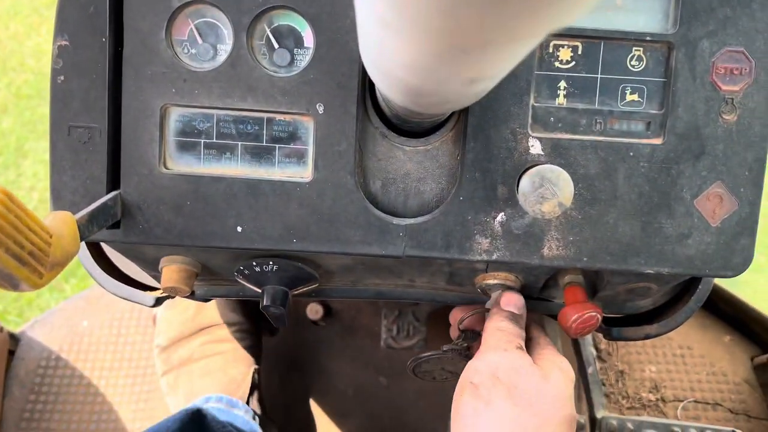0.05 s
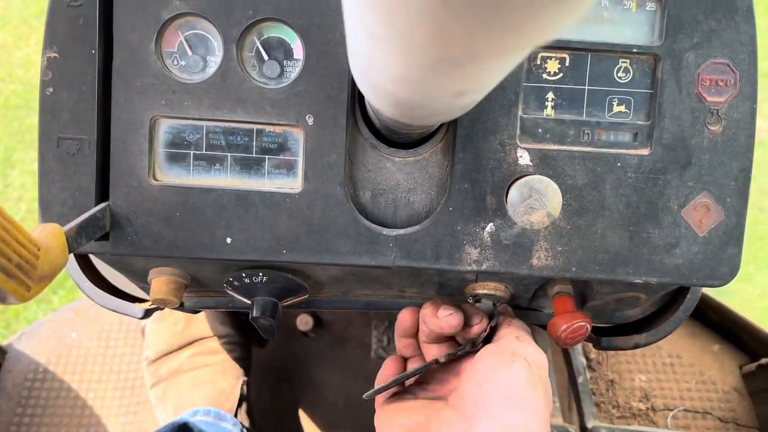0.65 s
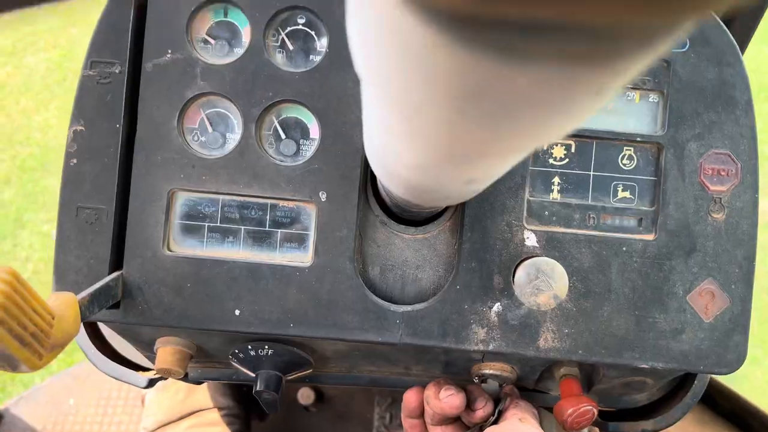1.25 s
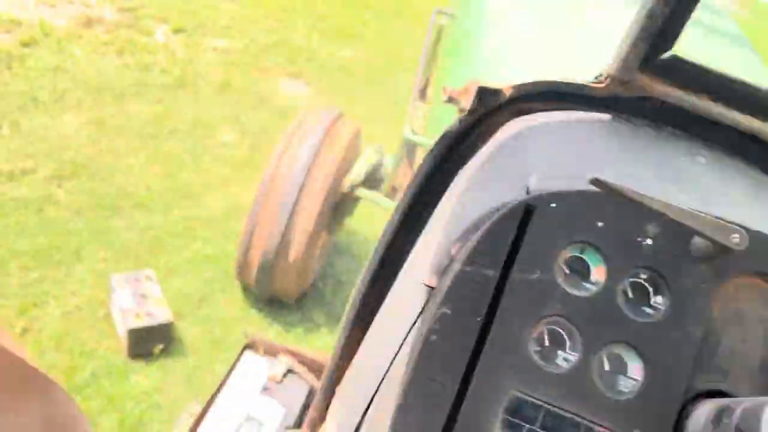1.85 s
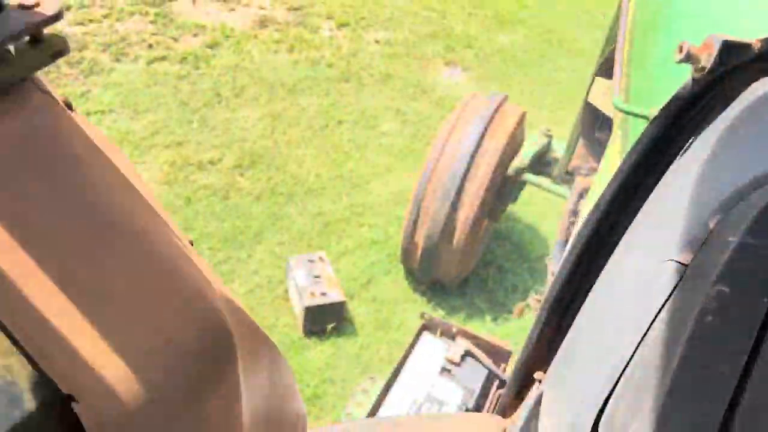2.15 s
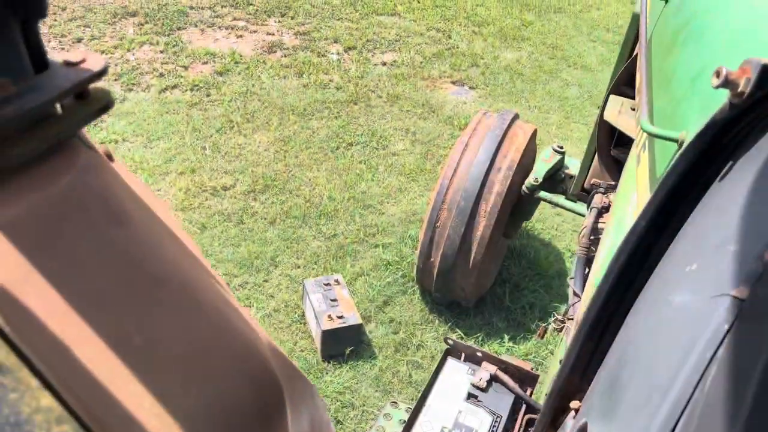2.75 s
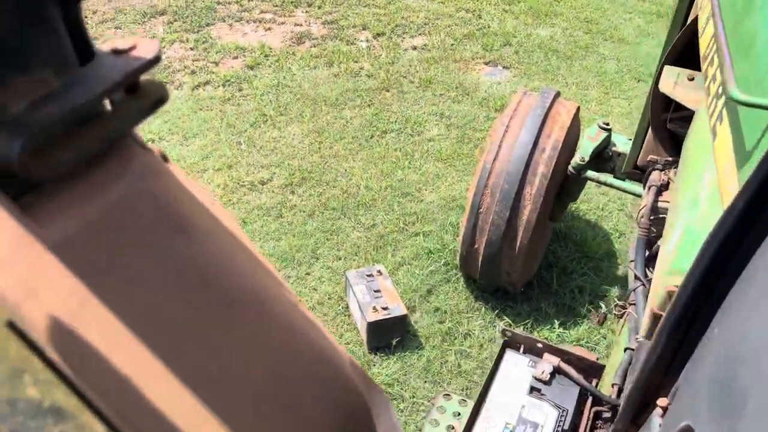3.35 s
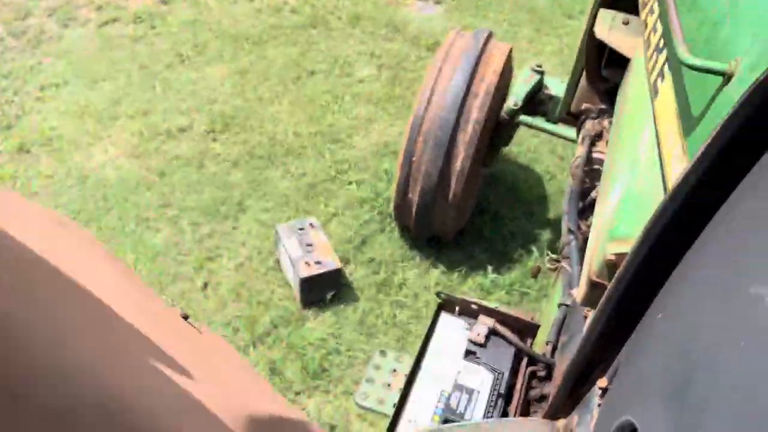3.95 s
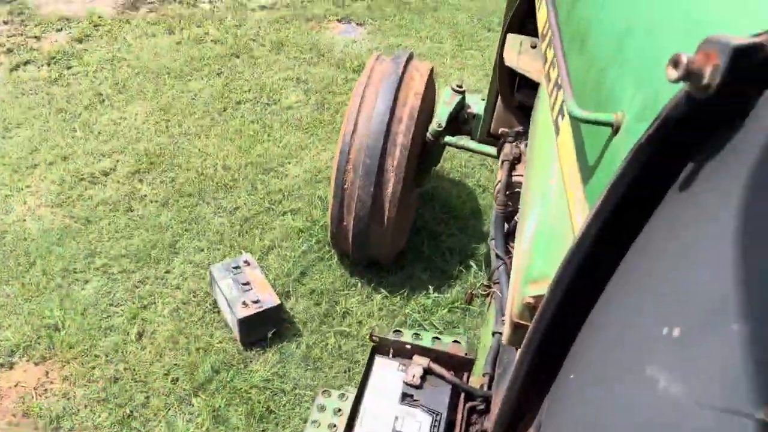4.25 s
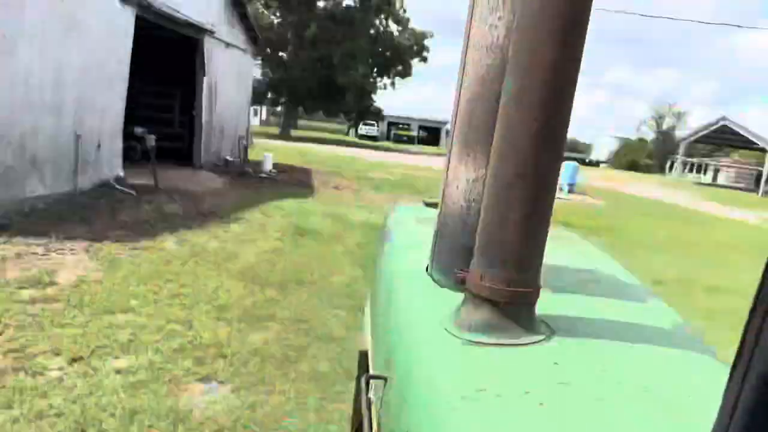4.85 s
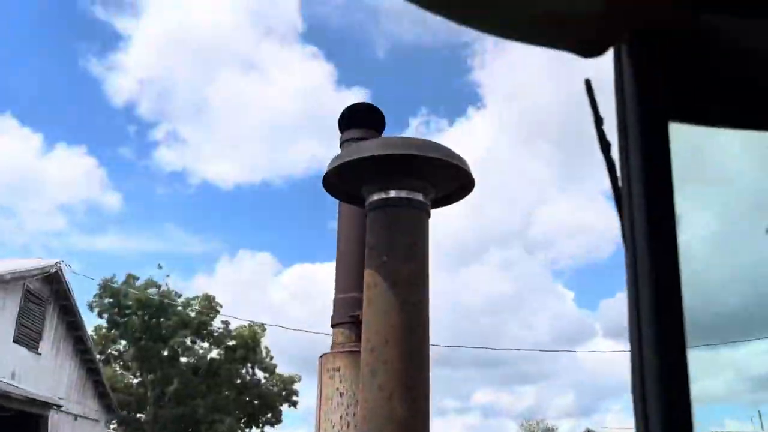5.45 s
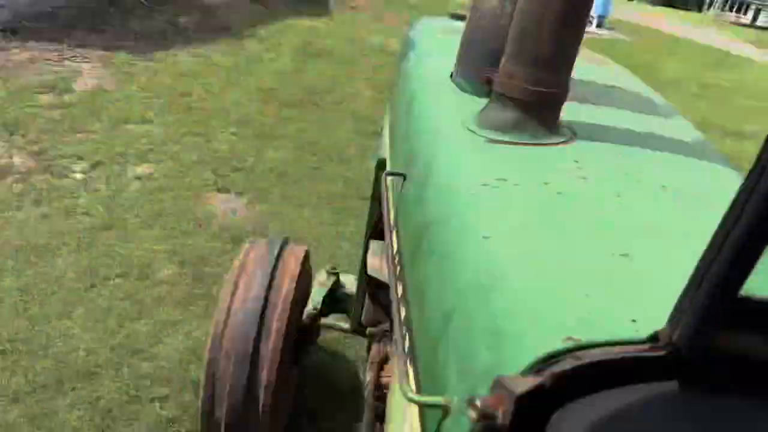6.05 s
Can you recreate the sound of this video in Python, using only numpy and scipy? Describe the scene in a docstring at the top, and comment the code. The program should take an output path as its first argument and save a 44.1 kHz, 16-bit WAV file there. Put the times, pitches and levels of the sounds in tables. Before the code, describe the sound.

Key clicks and a short starter whine, then a tractor's diesel engine catches, revs up with metal clatter and drops to idle.

```python
"""A six-cylinder diesel tractor is started, heard from the driver's seat.
First the key clicks, the solenoid slams in and the starter's gear teeth whine for half a second.
Then the engine catches: periodic firings drive the exhaust and excite the block, and as the speed
flares, forced vibration rattles loose metal in the cab. The fuel is cut and the engine coasts down
with a faint whistle. Last, the governor lifts it to a gently hunting idle."""
import sys
import numpy as np
from scipy import signal
from scipy.fft import rfft, irfft, next_fast_len
from scipy.io import wavfile
from scipy.ndimage import uniform_filter1d, minimum_filter1d

SR = 44100
rng = np.random.default_rng(int(sys.argv[2]) if len(sys.argv) > 2 else 0)


def wrap_up_sound(samples):
    """Save the sound to the file named by the first command line argument, as 16-bit audio."""
    columns = np.atleast_2d(samples).T
    # keep every value between -1 and 1, then stretch to whole-number steps
    tamed = np.clip(columns, -1, 1)
    steps = np.round(tamed * 32767).astype(np.int16)
    wavfile.write(sys.argv[1], SR, steps)


N = 268569
T = np.arange(N) / SR


def amp(db):
    """Amplitude ratio of a level."""
    return 10 ** (np.asarray(db) / 20)


def unit_rms(x):
    """Normalisation to rms 1."""
    return x / np.sqrt(np.mean(x ** 2) + 1e-20)


def curves(rows):
    """Linear interpolation of a table's columns in time."""
    times, *columns = np.transpose(rows)
    return [np.interp(T, times, column) for column in columns]


def level_at(spectrum, hz):
    """Interpolation of a spectrum on a log-frequency axis."""
    f, db = np.transpose(spectrum)
    return np.interp(np.log(hz + 1), np.log(f + 1), db)


def ramp(start, length):
    """Linear rise from 0 to 1."""
    return np.clip((T - start) / length, 0, 1)


def arch(start, length):
    """Half-sine envelope."""
    return np.sin(np.pi * ramp(start, length))


def add(mix, start, sound):
    """Superposition of a sound from its start time."""
    part = mix[..., max(round(start * SR), 0):][..., :sound.shape[-1]]
    part += sound[..., :part.shape[-1]]


def wander(hz):
    """Random fluctuation: low-pass noise of rms 1."""
    lowpass = np.exp(-(np.fft.rfftfreq(N, 1 / SR) / hz) ** 2)
    return unit_rms(irfft(rfft(rng.standard_normal(N)) * lowpass, N))


def resonance_db(hz, modes):
    """Level added by Lorentzian resonance peaks."""
    return sum(lift / (1 + (2 * (hz - f) / width) ** 2) for f, width, lift in modes)


def colour(x, spectrum, modes=(), size=8192):
    """Minimum-phase filter of unit energy: a broad spectrum plus narrow resonances."""
    hz = abs(np.fft.fftfreq(size, 1 / SR))
    db = level_at(spectrum, hz) + resonance_db(hz, modes)
    log_gain = np.log(amp(np.maximum(db, -100)))
    taps = np.fft.ifft(np.exp(np.conj(signal.hilbert(log_gain)))).real[:size // 2]
    return signal.oaconvolve(x, taps[None] / np.linalg.norm(taps), axes=1)[:, :N]


def resonate(x, hz, width, skirt_widths=7):
    """Forced response of one mode at rms 1; a second, wider filter steepens its skirts."""
    for bandwidth in (width, width * skirt_widths):
        x = signal.lfilter(*signal.iirpeak(hz, hz / bandwidth, SR), x)
    return unit_rms(x)


def impact(t60, tail_db, tail_t60, rise_s=0.00026):
    """Two-slope decay of noise: a metallic crack and its reverberation in the cab."""
    t = np.arange(SR // 3) / SR
    decay = amp(-60 * t / t60) + amp(tail_db - 60 * t / tail_t60)
    return decay * (1 - np.exp(-t / rise_s)) * rng.standard_normal((2, len(t)))


# spectrum of the faint background rumble and hiss: f/Hz, level/dB
BACKGROUND_SPECTRUM = [(18, -23), (30, 1.5), (95, -3.5), (202, -17), (315, -15), (410, -24.5), (2180, -36),
                       (6210, -48), (9940, -47), (10700, -51), (11900, -37), (15500, -41)]
def background():
    """Ambient noise: steady, random and strongest in the bass."""
    return amp(-54) * colour(rng.standard_normal((2, N)), BACKGROUND_SPECTRUM)


# sound field in the cab: f/Hz, side against mid/dB
CAB_WIDTH = [(40, -36), (70, -24), (125, -10.5), (250, -13.5), (500, -6.5), (1000, -3), (2500, -2),
             (5000, -2.5), (8500, 3), (12500, -1)]
# its balance: f/Hz, left minus right/dB
CAB_BALANCE = [(60, 0.34), (200, 1), (700, 1), (1500, 2), (2400, 0.5), (4400, 7), (8000, 2), (15000, -2)]
def cab(mid_side):
    """Decorrelation: reflections from the glass widen the treble. Returns left and right."""
    size = next_fast_len(N + 4096)
    hz = np.fft.rfftfreq(size, 1 / SR)
    mid, side = rfft(mid_side, size)
    side = side * amp(level_at(CAB_WIDTH, hz))
    lean = amp(level_at(CAB_BALANCE, hz) / 2)
    return irfft(np.array([(mid + side) * lean, (mid - side) / lean]), size)[:, :N]


def whistle(start_s=1.95, length_s=0.93, start_hz=3970, fall_hz_per_s=400):
    """Frequency glide: a thin wavering tone sinks while the engine coasts."""
    hz = (start_hz - fall_hz_per_s * (T - start_s)) * (1 + 0.0033 * wander(84))
    envelope = amp(-47.5 + 2 * wander(25)) * arch(start_s, length_s)
    return np.array([envelope * np.sin(2 * np.pi * np.cumsum(hz) / SR), np.zeros(N)])


# jolts to the cab: t/s, level/dB, f/Hz, T60/s
CAB_JOLTS = [(0, -42.5, 99, 0.45), (0.18, -29, 128, 0.28), (.19, -37, 82.6, 0.39), (.618, -12, 80.6, 0.34),
             (0.671, -7, 73, 0.16), (1.02, -19.5, 62, 0.64)]
def jolts():
    """Damped free vibration: the cab booms as the switch and the starter's torque jolt it."""
    out, t = np.zeros((2, N)), np.arange(SR) / SR
    for start, db, hz, t60 in CAB_JOLTS:
        envelope = amp(db - 60 * t / t60) * (1 - np.exp(-t / 0.0095))
        add(out[0], start, envelope * np.sin(2 * np.pi * hz * t))
    return out


# impacts of key, switch and solenoid: t/s, level/dB, tilt/(dB per octave), T60/s
SWITCH_IMPACTS = [(.098, -56, -5.5, 0.25), (.131, -41.5, -1.5, 0.34), (0.152, -33, 0, 0.064),
                  (0.161, -21, 2.5, 0.07), (.176, -28, -9.5, 0.13), (0.482, -59, 7, 0.059),
                  (0.509, -50.5, -0.5, 0.45), (.544, -35.5, 4, 0.18), (.568, -25, -4.5, 0.37),
                  (.574, -22, -3.5, .12), (0.589, -16, 4, 0.086), (0.617, -31, 4.5, 0.21)]
# their spectrum: f/Hz, level/dB
SWITCH_SPECTRUM = [(60, -45), (100, -25), (228, -0.5), (326, -11), (564, 2.5), (1620, 1.5), (2000, -6),
                   (4000, -10.5), (7700, -23), (15500, -33.5)]
def switchgear():
    """Impact noise: the key turns through its detents and the solenoid throws the pinion in."""
    out = np.zeros((2, N))
    for start, db, tilt, t60 in SWITCH_IMPACTS:
        hit = np.zeros((2, N))
        add(hit, start, amp(db) * impact(t60, tail_db=-36, tail_t60=0.2))
        out += colour(hit, [(hz, level + tilt * np.log2(hz / 1000)) for hz, level in SWITCH_SPECTRUM])
    return out


# gear mesh of the starter, which slows at each compression: t/s, f/Hz, level/dB
CRANKING = [(.6, 300, -47), (.685, 464, -34), (.72, 560, -42), (.755, 610, -37), (.785, 690, -24),
            (.83, 805, -30), (.865, 815, -30), (.9, 705, -29), (.98, 670, -36), (1.025, 700, -27),
            (1.07, 658, -25), (1.1, 725, -27), (1.14, 810, -26.5), (1.18, 865, -26), (1.22, 790, -22),
            (1.26, 730, -31), (1.35, 620, -40)]
# its partials: multiple of the mesh frequency, level under load/dB, level running light/dB
MESH_PARTIALS = [(.667, -9, -11), (1, 1, -15), (1.333, -17, -14), (1.667, -18, -10), (2, -7.5, -5.5),
                 (3, -24, -21)]
# bell housing resonances: f/Hz, bandwidth/Hz, gain/dB
HOUSING_MODES = [(460, 60, 4), (680, 60, 3), (1420, 90, 4), (1600, 80, 2)]
def starter(unloaded_s=0.97, grind_depth=0.75, grind_hz=125):
    """Gear-mesh tone: uneven teeth modulate a whine that thins as the first firings take the load."""
    mesh_hz, mesh_db = curves(CRANKING)
    unloaded = ramp(unloaded_s, 0.042)
    phase = 2 * np.pi * np.cumsum(mesh_hz * (1 + 0.016 * wander(120))) / SR
    out = np.zeros((2, N))
    for k, loaded_db, light_db in MESH_PARTIALS:
        partial_db = loaded_db + unloaded * (light_db - loaded_db)
        gain = amp(mesh_db - 3 + partial_db + resonance_db(k * mesh_hz, HOUSING_MODES))
        grind = 1 + grind_depth * (wander(grind_hz) + 1j * wander(grind_hz))
        tone = np.exp(1j * (k * phase + 2 * np.pi * rng.random((2, 1))))
        out += gain * (grind * tone).real
    return out * (T > CRANKING[0][0]) * (T < CRANKING[-1][0])


HUNT_FROM_S, HUNT_CREST_S, HUNT_PERIOD_S = 4.046, 4.3, 0.2658
def hunting():
    """Governor hunting: a slow oscillation about the idle, between -1 and 1."""
    return ramp(HUNT_FROM_S, HUNT_PERIOD_S) * np.cos(2 * np.pi * (T - HUNT_CREST_S) / HUNT_PERIOD_S)


# spectrum of a thin guard: f/Hz, level/dB
GUARD_SPECTRUM = [(1000, -30), (1900, 1.5), (2800, 1.5), (4200, -4.5), (5200, -12.5), (8000, -15.5),
                  (15000, -33)]
# its resonances: f/Hz, bandwidth/Hz, gain/dB
GUARD_MODES = [(2790, 70, 11), (3420, 150, 9), (4200, 120, 7), (4490, 90, 6), (5230, 80, 7)]
def guard(shake, crest_db=-33.5, trough_db=-12.5, fade_db_per_s=0.2):
    """Amplitude modulation: a guard rattles on each crest of the hunting, slowly calming."""
    db = crest_db - fade_db_per_s * np.maximum(T - HUNT_CREST_S, 0) + trough_db * (1 - hunting()) / 2
    return colour(shake, GUARD_SPECTRUM, GUARD_MODES) * amp(db) * ramp(HUNT_FROM_S, HUNT_PERIOD_S)


# modes of a small loose part: f/Hz, bandwidth/Hz, level/dB
SIZZLE_MODES = [(5800, 130, 0), (6080, 150, -3)]
def sizzle(shake, start_s=4.92, fade_db_per_s=36):
    """Exponential decay: a small part sizzles once in its high modes and comes to rest."""
    age = np.maximum(T - start_s, 0)
    ringing = sum(amp(db) * resonate(shake, hz, width) for hz, width, db in SIZZLE_MODES)
    return ringing * ramp(start_s, 0.03) * amp(-44.5 - fade_db_per_s * age)


# modes of the cab panels: f/Hz, bandwidth/Hz, level/dB
PANEL_MODES = [(247, 37, 0.5), (299, 23, -3.5), (431.4, 12, 0.5), (1125, 53, -2), (1216, 44, -6),
               (1260, 23, -12), (2010, 45, -23), (2100, 34, -16), (3000, 73, -25)]
def panels(shake, thud_db):
    """Nonlinear rattle: the buzz of loose panels grows faster than the shaking, up to a ceiling."""
    out = np.zeros((2, N))
    for hz, width, db in PANEL_MODES:
        out += amp(db) * unit_rms(signal.lfilter(*signal.iirpeak(hz, hz / width, SR), shake))
    return unit_rms(out) * amp(-22.5 + 2.55 * np.minimum(thud_db + 17, 1))


# clanks: t/s, level/dB, T60/s, left minus right/dB, own resonance f/Hz, its bandwidth/Hz
METAL_IMPACTS = [(.772, -36, .13, 3, 3500, 300), (0.835, -27, 0.18, 5.5, 5800, 350),
                 (1.013, -24.5, 0.27, 4, 4130, 200), (1.16, -24.5, 0.12, 5, 5300, 500),
                 (1.256, -24, 0.079, 4, 5900, 350), (1.326, -11, 0.14, 2.5, 4200, 900),
                 (1.363, -21, .06, 3, 5000, 1500), (1.404, -17.5, 0.068, 3, 1870, 350),
                 (1.459, -21, 0.093, 8, 4970, 400), (1.503, -6, 0.08, 3, 4560, 380),
                 (1.538, -19, .08, 3, 4560, 200), (1.639, -8.5, 0.085, 5, 2950, 500),
                 (1.667, -20, .06, 4, 5650, 400), (1.7533, -5, 0.075, 5, 3520, 600),
                 (1.783, -16, 0.08, 6, 5850, 400), (1.856, -6.5, 0.069, 4, 4050, 700),
                 (1.8866, -14.5, 0.07, 7, 2090, 350), (3.1, -33, .2, 2, 3380, 200),
                 (3.703, -24, .1, 2, 5003, 349.8), (3.7676, -22, 0.06, 9, 4055, 220),
                 (3.797, -23, .06, 6, 4550, 300), (3.82, -18.5, 0.053, 5, 4250, 300),
                 (3.861, -11, 0.074, 2, 2230, 350), (4.001, -12.5, 0.057, 4, 2800, 350),
                 (4.2767, -25.5, 0.072, 5, 1915, 350), (4.549, -21, 0.064, 1, 3950, 349.7),
                 (4.824, -22, 0.073, 2, 2341, 350)]
# their spectrum: f/Hz, level/dB
METAL_SPECTRUM = [(300, -6), (900, 10), (1900, 0), (2500, 1.5), (3400, 0), (5850, 1), (9000, -6),
                  (13000, -7.5), (16000, -11)]
# resonances common to all clanks: f/Hz, bandwidth/Hz, nominal gain/dB
METAL_MODES = [(2030, 130, 8), (2450, 70, 5), (2900, 150, 5), (3380, 120, 7), (3720, 70, 5),
               (4520, 110, 3.5), (4950, 80, 5), (5680, 80, 6), (6100, 110, 7), (6600, 70, 7),
               (7370, 100, 5), (8600, 100, 6)]
def clanks(own_ring_db=10, spread=0.9):
    """Impact excitation: the engine rocks and loose metal clanks, each contact favouring other modes."""
    out = np.zeros((2, N))
    for start, db, t60, pan_db, hz, width in METAL_IMPACTS:
        gains = amp(db - 3 + np.array([[pan_db], [-pan_db]]) / 2)
        hit = gains * impact(t60, tail_db=-20.5, tail_t60=0.64, rise_s=0.001)
        modes = [(f, w, lift * (1 + spread * rng.uniform(-0.94, 1))) for f, w, lift in METAL_MODES]
        add(out, start, colour(hit, METAL_SPECTRUM, modes + [(hz, width, own_ring_db)]))
    return out


# stretches of louder ringing and hum in the cab: t/s, duration/s, level/dB, f/Hz, bandwidth/Hz
RINGING_STRETCHES = [(1.21, .11, -22, 500, 90), (1.32, .65, -24, 305, 45), (1.607, .33, -27.5, 2090, 130),
                     (1.87, .074, -23, 1230, 110), (2.6, 1.7, -34, 770, 110), (3.09, .1, -37, 1560, 90),
                     (3.7, .3, -25, 640, 260), (3.72, .16, -25.5, 1225, 90), (3.85, .24, -29, 1050, 300),
                     (3.78, .06, -26, 1940, 90), (4.15, .95, -27, 510, 120), (5.1, .95, -34.5, 970, 80)]
def cab_ringing(shake):
    """Narrow-band resonance: ringing and hum swell and fade, each stretch at one pitch."""
    return sum(amp(db) * arch(start, length) * resonate(shake, hz, width)
               for start, length, db, hz, width in RINGING_STRETCHES)


# modes of a loose sheet-metal cover: f/Hz, bandwidth/Hz, level/dB
COVER_MODES = [(250, 44, 12.5), (431, 32, 1.5), (562, 42, 7.5), (962, 29, 0), (1216.5, 43, 4),
               (1552, 92, -3), (1942, 47, 2.5), (2784, 52, -3.5), (3334, 100, -2), (3944, 35, -5.5)]
def cover_chatter(shake, clatter_db, loose_db=-23, drift_db=3.5, drift_hz=6.2):
    """Forced vibration: the cover taps at each firing; as it shifts, one mode after another leads."""
    modes = np.array([resonate(shake, hz, width) * amp(drift_db * np.tanh(wander(drift_hz)))
                      for hz, width, _ in COVER_MODES])
    seated = unit_rms(np.tensordot(mode_shares(centre_hz=1110, fall_db=9), modes, 1))
    loose = unit_rms(np.tensordot(mode_shares(centre_hz=2080, fall_db=4), modes, 1))
    chatter_db = -47 + 3.8 * np.minimum(clatter_db - loose_db, 0)  # dies fast below loose_db
    return seated * amp(clatter_db - 12.5) + loose * amp(chatter_db)


def mode_shares(centre_hz, fall_db):
    """Modal participation: the cover's modes weaken by the octave on both sides of a centre."""
    hz, _, db = np.transpose(COVER_MODES)
    gains = amp(db - fall_db * abs(np.log2(hz / centre_hz)))
    return gains / np.linalg.norm(gains)


# hard slaps of the cover: t/s, level/dB, centre f/Hz, fall/(dB per octave)
COVER_SLAPS = [(1.316, -8, 1240, 21), (1.33, -8, 2000, 20), (1.408, -8, 1500, 4), (1.53, -4, 560, 9),
               (1.575, -3, 450, 9), (1.641, -10, 2100, 7), (1.684, 1, 330, 7), (1.745, -15, 2000, 16),
               (1.797, 0, 300, 11), (1.897, -5, 1250, 10), (3.721, -6.5, 700, 8), (3.748, -13, 900, 9),
               (3.772, -9.5, 1220, 18), (3.794, -17, 1950, 25), (3.808, -10.5, 750, 9),
               (3.846, -20, 1800, 13), (3.9, -13, 649.7, 8), (3.932, -11, 560.5, 10), (4.002, -10, 1900, 2),
               (4.55, -7, 2301, 4.5), (4.826, -16, 3102, 5), (5.31, -14, 961, 11)]
def cover_slaps(rise_cycles=1.8, detune=0.01):
    """Modal superposition: the cover slams and rings out; where it lands decides which modes lead."""
    out, t = np.zeros((2, N)), np.arange(SR // 6) / SR
    for start, db, centre_hz, fall_db in COVER_SLAPS:
        for share, (hz, width, _) in zip(mode_shares(centre_hz, fall_db), COVER_MODES):
            envelope = np.exp(-np.pi * width * t) * (1 - np.exp(-t * hz / rise_cycles))
            cycles = hz * (1 + detune * rng.standard_normal()) * t + rng.random((2, 1))
            add(out, start, amp(db) * share * envelope * np.sin(2 * np.pi * cycles))
    return out


# fuel fed by the governor, cut at the top of the flare and restored in two steps: t/s, level/dB
FUEL_FEED = [(1.1, -22), (1.2, -6.5), (1.38, -7), (1.47, 8), (1.7, -0.5), (1.88, -1.5), (1.96, -1),
             (2.02, -21), (2.55, -19), (2.85, -22), (3, -14.5), (3.12, -3.5), (3.7, -5.5), (3.82, -2.5),
             (4.1, -4.5), (6.09, -8)]
# cab resonance acting on the first two orders: f/Hz, level at full fuel/dB
CAB_BOOM = [(23, -31), (29, -37), (35, -26), (44, -15), (58, -7.5), (70, -9.5), (88, -17.5), (100, -14.5),
            (120, -39)]
# weaker orders from unequal cylinders: multiple of the firing rate, level against the thud/dB
WEAK_ORDERS = [(1.5, -30), (2.333, -33), (2.5, -8.5), (2.667, -9), (3, -13), (4, -15), (5, -16),
               (5.333, -21), (7, -19)]
# response of the cab's air to those orders: f/Hz, gain/dB
CAB_RESPONSE = [(100, -6.5), (118, -6), (135, 0.5), (155, -15.5), (180, 2.5), (230, -2), (280, 0.5)]
def exhaust(cycles, firing_hz, thud_db):
    """Engine orders: tones at multiples of the firing rate sweep through the cab's resonances."""
    fuel_db, phase = curves(FUEL_FEED)[0], 2 * np.pi * cycles
    first_db = fuel_db + 2.5 * hunting() + level_at(CAB_BOOM, firing_hz)
    pumping_db = -12 + 17 * np.log2(firing_hz / 38.2)  # compression alone, with the fuel cut
    second_db = np.maximum(fuel_db, pumping_db) - 1.5 + level_at(CAB_BOOM, 2 * firing_hz)
    second_db += 0.75 * wander(4.7)
    drone = amp(first_db) * np.sin(phase) - amp(second_db) * np.cos(2 * phase)
    for order, db in WEAK_ORDERS:
        order_db = thud_db + db + level_at(CAB_RESPONSE, order * firing_hz) + 2 * wander(4.5)
        drone += amp(order_db) * np.cos(order * phase + 2 * np.pi * rng.random())
    return np.sqrt(2) * drone * ramp(1.08, 0.066)


def firings(cycles, t60, alike, uneven_db, chance_db, rise_s=0.0024, cylinders=6):
    """Cyclostationary noise: a burst per firing; each cylinder repeats the share `alike` of its power."""
    onsets = np.flatnonzero(np.diff(np.floor(cycles)))
    t = np.arange(SR // 8) / SR
    envelope = amp(-60 * t / t60) * (1 - np.exp(-t / rise_s))
    signatures = rng.standard_normal((cylinders, 2, len(t)))
    cylinder_db = uneven_db * unit_rms(rng.permutation(cylinders) - (cylinders - 1) / 2)
    out = np.zeros((2, N))
    for k, i in enumerate(onsets):
        fresh = rng.standard_normal((2, len(t)))
        burst = np.sqrt(alike) * signatures[k % cylinders] + np.sqrt(1 - alike) * fresh
        gain = amp(cylinder_db[k % cylinders] + chance_db * rng.uniform(-0.74, 1))
        gain /= np.sqrt(cycles[i + 1] - cycles[i])  # keeps the power independent of speed
        add(out, i / SR, gain * envelope * burst)
    return unit_rms(out)


# engine speed as firing rate: t/s, f/Hz
FIRING_RATE = [(1.1, 23.1), (1.33, 26.2), (1.5, 38), (1.8, 56.6), (1.98, 61.6), (2.4, 49.8), (2.55, 43.6),
               (2.7, 41.9), (3.03, 31.5), (3.22, 36.8), (3.45, 34.4), (3.8, 35.8), (3.9, 41.1), (4.05, 45),
               (4.2, 41.9), (4.5, 44), (6.09, 44.5)]
# how hard it works: t/s, block thud level/dB, gear and valve clatter level/dB, injector tick level/dB
ENGINE_LEVELS = [(.62, -29.5, -48, -58), (.8, -32.5, -40, -50), (1, -30, -36, -49.5), (1.05, -30, -32, -40),
                 (1.13, -26.5, -32.5, -42.5), (1.23, -21, -24.5, -35.5), (1.45, -15.5, -20, -35),
                 (1.8, -16.5, -23, -31.5), (1.92, -18, -22.5, -34), (1.99, -22, -26, -37),
                 (2.4, -22.5, -25.5, -38), (3.02, -25, -31, -44.5), (3.13, -24, -25.5, -39.5),
                 (3.68, -21.5, -28.5, -42), (3.77, -20, -20, -32), (4.1, -20, -24, -39.5),
                 (5.1, -23.5, -24, -38.5), (6.09, -22.5, -24, -40.5)]
# spectra of the low rumble, the thud, the clatter and the tick: f/Hz, level/dB
RUMBLE_SPECTRUM = [(18, -53), (35, -17), (55, 14), (72, 14.5), (100, -8), (140, -3), (300, -50.5)]
THUD_SPECTRUM = [(53, -30.5), (90, 1), (113, -9), (151, -12.5), (230, -3.5), (286, -12), (319, -9.5),
                 (470, -8.5), (553, -10.5), (606, -10), (780, -15), (1010, -45), (1720, -120)]
CLATTER_SPECTRUM = [(420, -38), (720, -3.5), (806, -4.5), (922, 0), (1120, -2.5), (1220, -11), (1350, -5),
                    (1720, -7.5), (1870, -12.5), (2100, -13), (2600, -16), (3380, -48.5), (5720, -120)]
TICK_SPECTRUM = [(1700, -15.5), (2400, 3), (3080, -1), (4000, -6.5), (5200, -6), (7000, -10), (9000, -18.5),
                 (11500, -15.5), (15000, -12.5), (16500, -47)]
# resonances of the block and its covers: f/Hz, bandwidth/Hz, gain/dB
BLOCK_MODES = [(550, 34, 6), (654, 25, 4), (935, 26, 7), (1014, 27, 3.5), (1190, 41, 8), (1847, 67, 7.5),
               (1940, 40, 6.5), (2630, 90, 4), (3430, 82, -1), (3850, 70, 2), (5640, 98, -7)]
def engine():
    """Source and filter: each firing excites block, gears, injectors, loose metal and exhaust."""
    firing_hz = curves(FIRING_RATE)[0]
    cycles = np.cumsum(firing_hz * (1 + 0.005 * wander(12))) / SR
    thud_db, clatter_db, tick_db = curves(ENGINE_LEVELS)
    clatter_db += 1.74 * hunting()
    rumble = firings(cycles, t60=0.21, alike=1, uneven_db=5, chance_db=4.5)
    thud = firings(cycles, t60=0.34, alike=0.65, uneven_db=1.4, chance_db=0.5)
    clatter = firings(cycles, t60=0.39, alike=0.54, uneven_db=2, chance_db=3.5)
    tick = firings(cycles, t60=0.5, alike=0.083, uneven_db=2, chance_db=2.6, rise_s=0.0034)
    out = colour(rumble, RUMBLE_SPECTRUM) * amp(thud_db - 6)
    out += colour(thud, THUD_SPECTRUM, BLOCK_MODES) * amp(thud_db - 2.5)
    out += colour(clatter, CLATTER_SPECTRUM, BLOCK_MODES) * amp(clatter_db - 4)
    out += colour(tick, TICK_SPECTRUM, BLOCK_MODES) * amp(tick_db)
    out += panels(firings(cycles, t60=0.15, alike=0.36, uneven_db=3, chance_db=1.5), thud_db)
    taps = firings(cycles, t60=0.11, alike=0.29, uneven_db=2.5, chance_db=5.5)
    out += cover_chatter(taps, clatter_db) + cab_ringing(taps)
    tremble = firings(cycles, t60=0.085, alike=0.3, uneven_db=2, chance_db=2.5)
    out += guard(tremble) + sizzle(tremble)
    out[0] += exhaust(cycles, firing_hz, thud_db)  # mid channel only
    return out * ramp(0.6, 0.044)


def scene():
    """Superposition: the sources share the cab's sound field; each clank has its own direction."""
    mid_side = background() + engine() + starter() + whistle() + switchgear() + jolts() + cover_slaps()
    return cab(mid_side) + clanks()


def record(dry, ceiling=0.96, cutoff_hz=15800):
    """Peak limiting by a smoothed gain, then band limiting by a low-pass filter."""
    gain = np.minimum(ceiling / (abs(dry).max(0) + 1e-9), 1)
    limited = dry * uniform_filter1d(minimum_filter1d(gain, size=301), size=301)
    lowpass = signal.firwin(511, cutoff_hz, window=("kaiser", 9), fs=SR)
    return signal.oaconvolve(limited, lowpass[None], "same")


dry = scene()
out = record(dry)
wrap_up_sound(out)
```